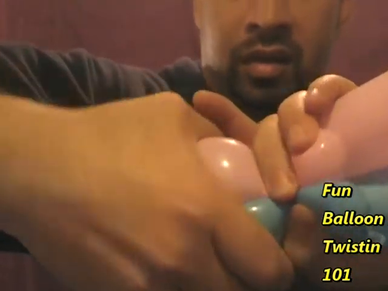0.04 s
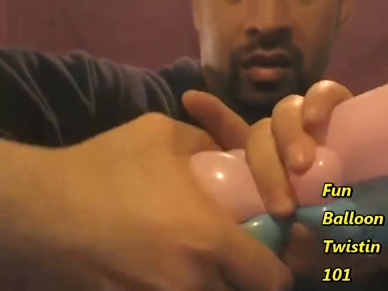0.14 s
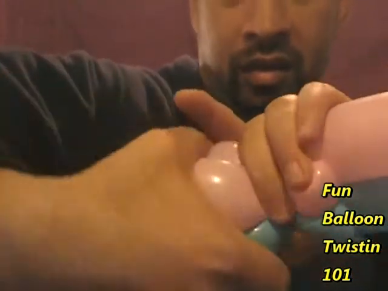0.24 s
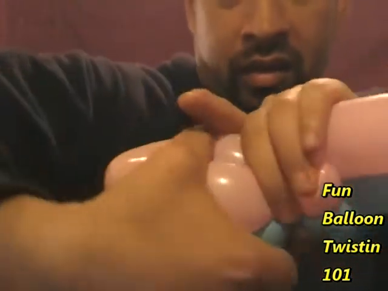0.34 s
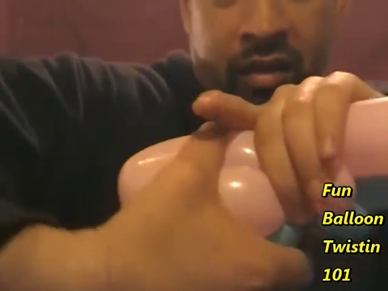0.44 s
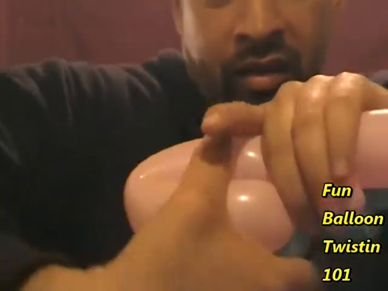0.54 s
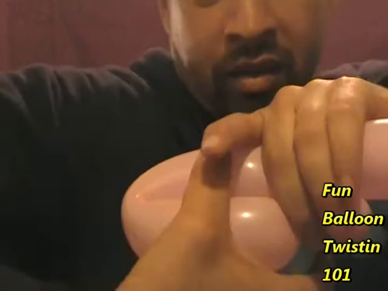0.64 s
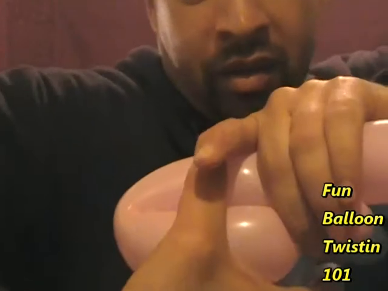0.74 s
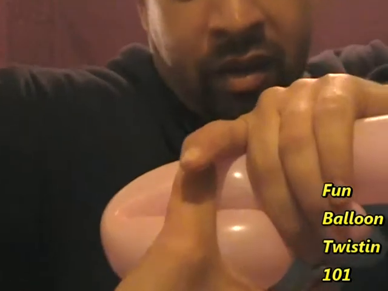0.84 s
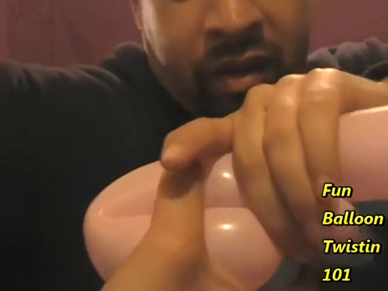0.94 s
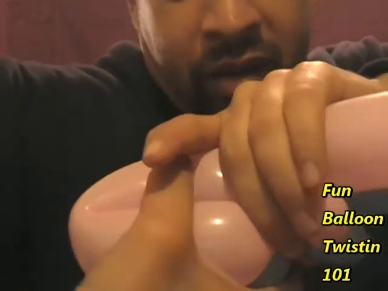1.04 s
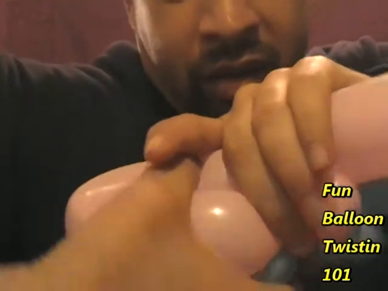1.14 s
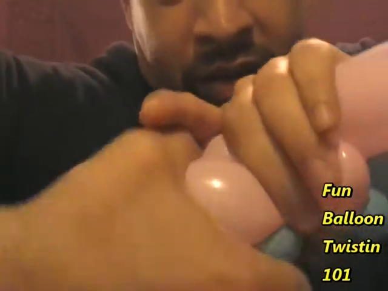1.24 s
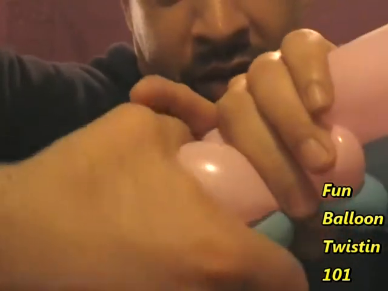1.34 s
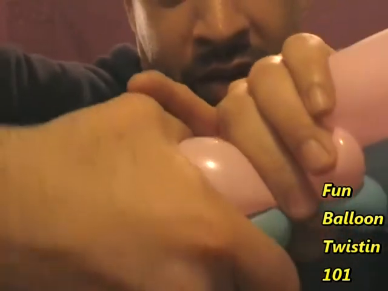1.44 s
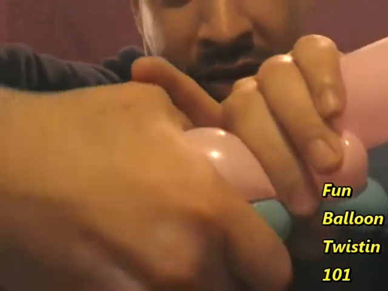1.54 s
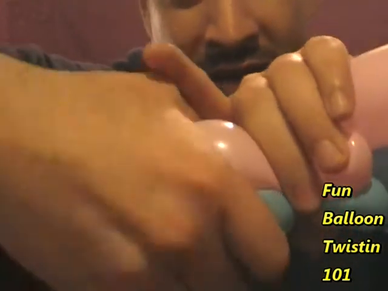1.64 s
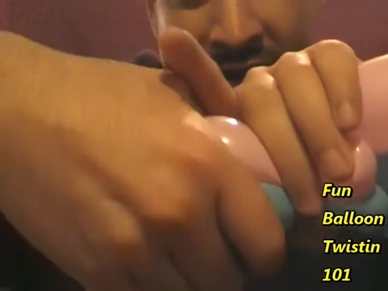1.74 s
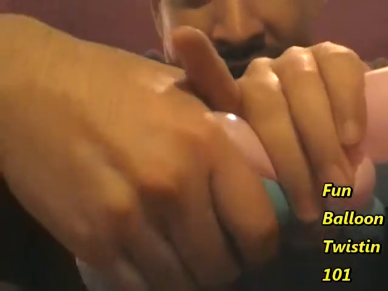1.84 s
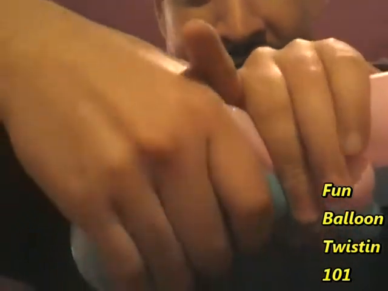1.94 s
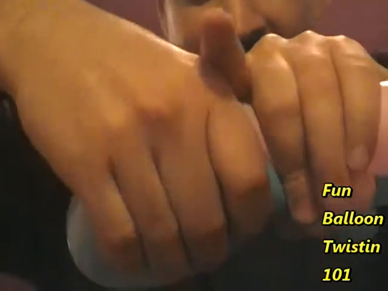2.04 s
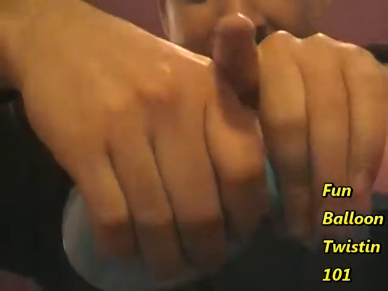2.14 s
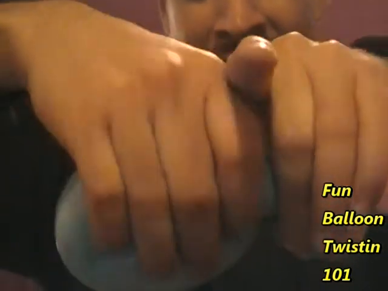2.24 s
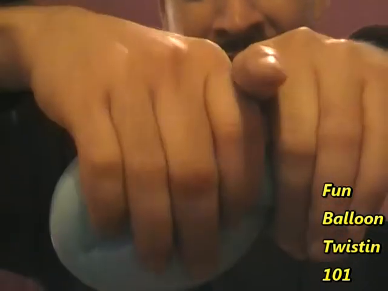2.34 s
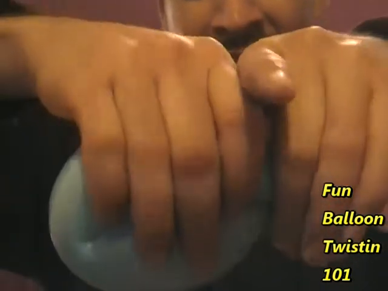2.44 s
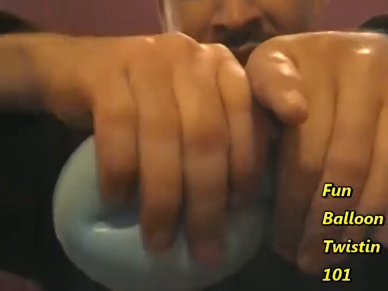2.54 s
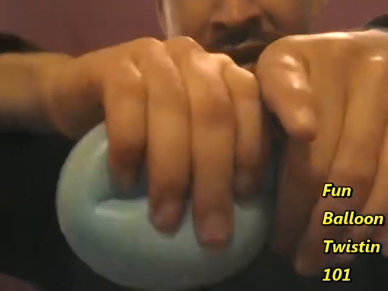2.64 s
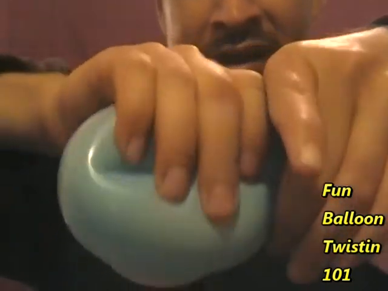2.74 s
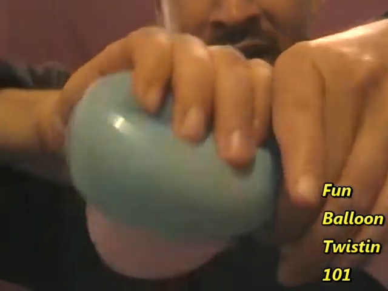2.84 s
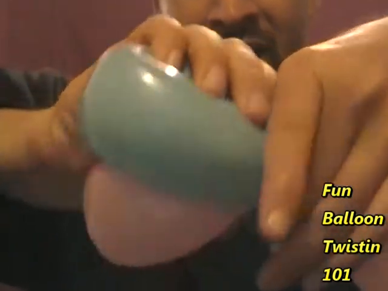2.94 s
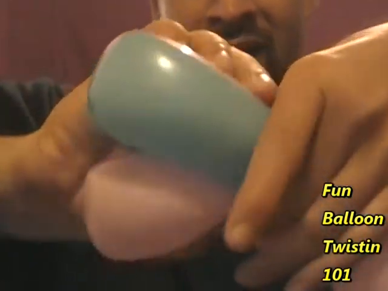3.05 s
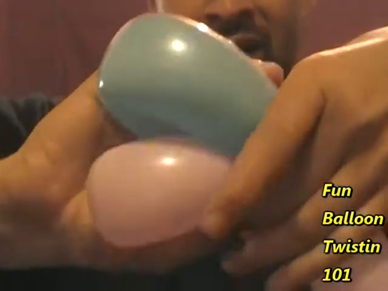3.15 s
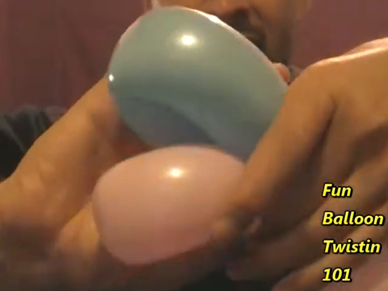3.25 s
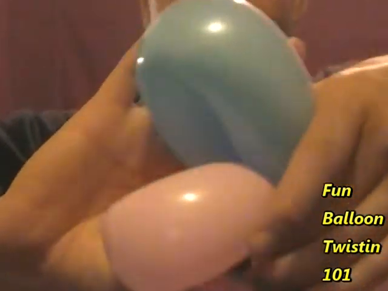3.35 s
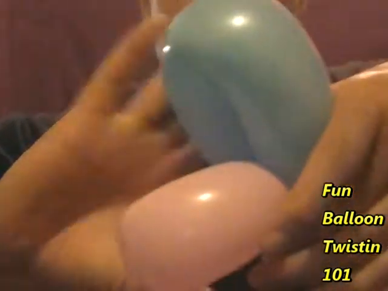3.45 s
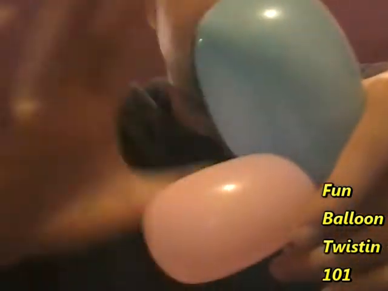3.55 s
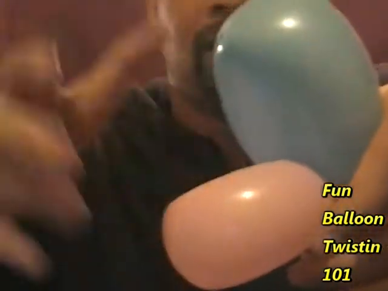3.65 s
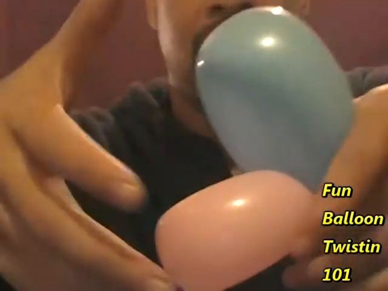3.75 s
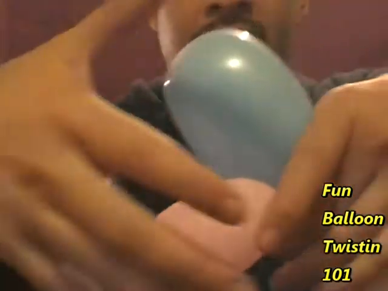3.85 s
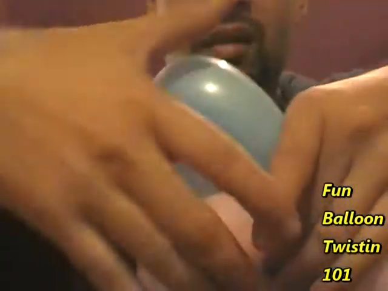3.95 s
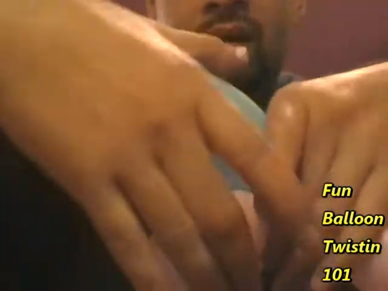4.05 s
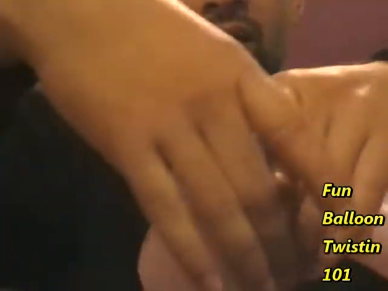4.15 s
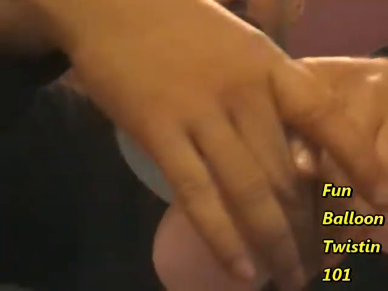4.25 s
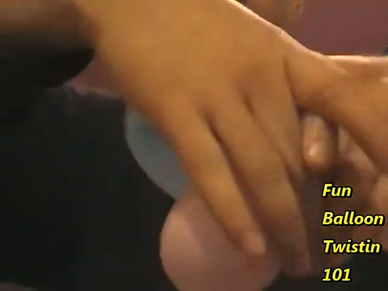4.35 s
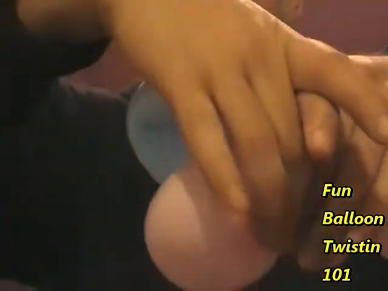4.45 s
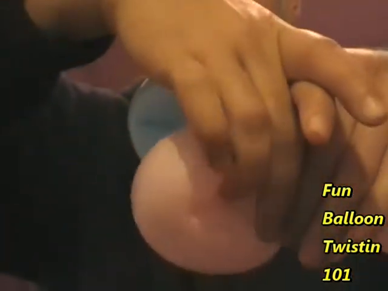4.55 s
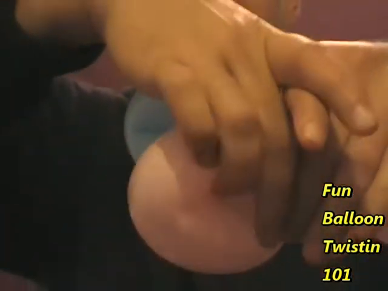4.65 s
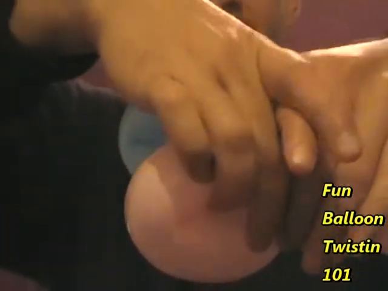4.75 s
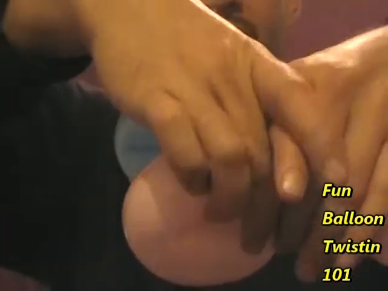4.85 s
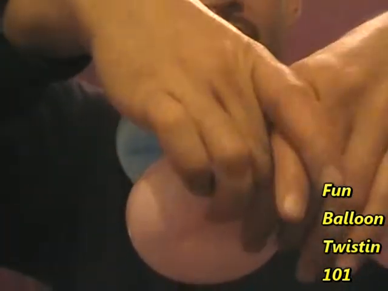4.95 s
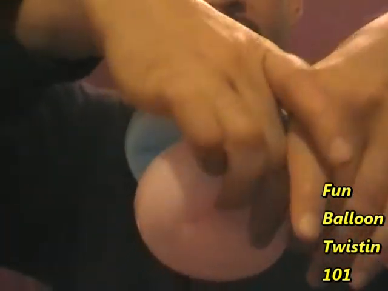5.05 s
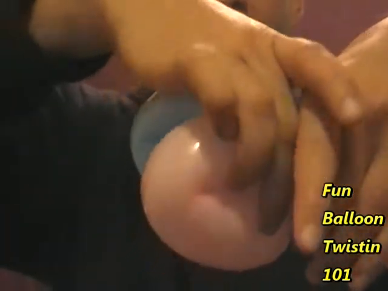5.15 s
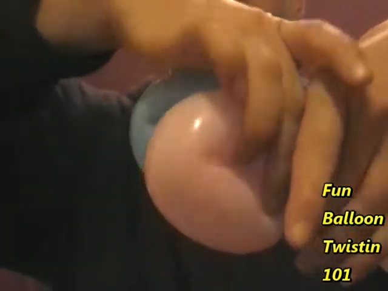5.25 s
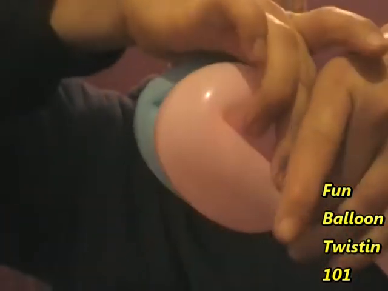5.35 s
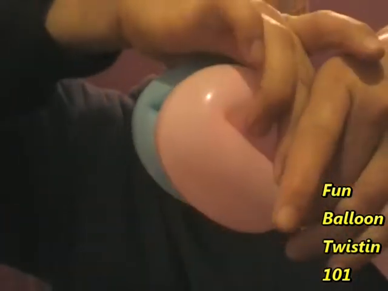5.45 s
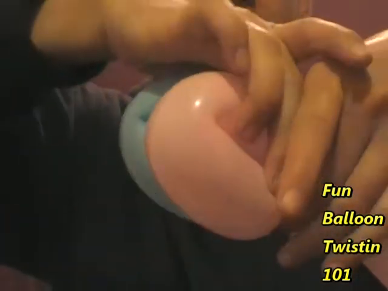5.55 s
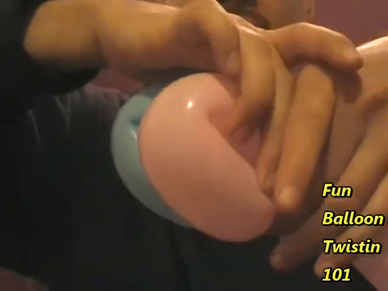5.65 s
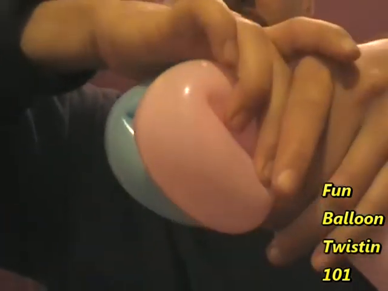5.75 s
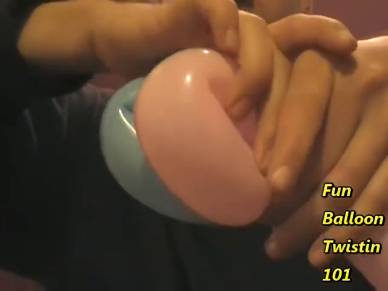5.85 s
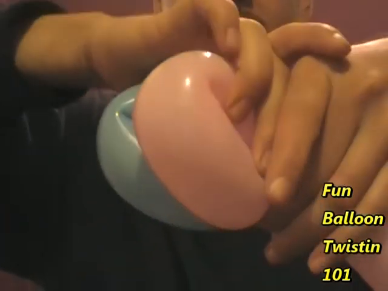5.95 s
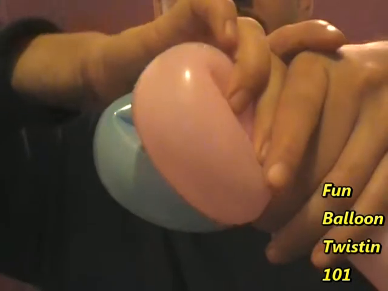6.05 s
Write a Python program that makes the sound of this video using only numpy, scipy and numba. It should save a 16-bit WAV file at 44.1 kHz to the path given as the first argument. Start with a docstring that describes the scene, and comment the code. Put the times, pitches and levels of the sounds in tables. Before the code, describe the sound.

Close up, hands twist taut latex balloons indoors: scratchry rubbing strokes, rubbery snaps, then a long tightening scrape with squeaks and buzzing ratchets.

```python
"""Balloons twisted by hand

Place: a small room with a faint noise floor. Distance: close. Microphone: two ports, in stereo.
Two hands twist inflated latex balloons; the latex sticks and slips as a scratchy rub, ratchets and snaps.
Short strokes come before and after one long twist, with squeaks, a run of zips, finger bumps and brushes.
Every slip shakes the taut skin and the air inside, whose resonances glide as the bubbles are squeezed."""
import sys
import numpy as np
from scipy import signal
from scipy.fft import rfft, irfft, next_fast_len
from scipy.io import wavfile
from scipy.ndimage import uniform_filter1d
from numba import njit

SR = 44100
rng = np.random.default_rng(int(sys.argv[2]) if len(sys.argv) > 2 else 0)


def generate_wav(signal):
    """Clip the signal to [-1, 1] and save it as 16-bit WAV at the path in sys.argv[1]."""
    frames = np.transpose(np.atleast_2d(signal))
    scaled = np.clip(frames, -1, 1) * 32767
    pcm = np.round(scaled).astype(np.int16)
    wavfile.write(sys.argv[1], SR, pcm)


N = 269451
TIME = np.arange(N) / SR
TAPS = 2 ** 14  # longest impulse response [samples]

# faint noise of the room: (frequency [Hz], relative density [dB per Hz])
FLOOR_COLOUR = [(25, -16), (50, -6), (220, -8.5), (500, -14), (1100, -19.5), (2000, -18.5), (7500, -20),
                (11000, -27.5), (16000, -48.5)]
# short rubbing strokes: (start [s], attack [s], hold [s], relative effort [dB], hiss over slips [dB],
# relative treble [dB], relative lower air mode [dB], relative upper air mode [dB])
STROKE_MOVES = [(0, 0.00094, 0.063, -40.5, 0.5, -3, -28, -34),
                (0.1, 0.015, 0.02, -28.5, 4.5, -4.5, -24, -18.5),
                (0.191, 0.023, 0.12, -24, 1.5, 0.5, -22.5, -4.5),
                (.42, 0.081, 0.039, -33.5, -2, -6, -35, -18), (0.711, 0.07, 0.02, -43, 41, -8.5, -21, -13),
                (0.908, 0.0084, 0.017, -41, 12, -2.5, -28, -24),
                (1.074, 0.045, 0.092, -26, -1, 1.5, -28.5, -18),
                (1.265, 0.0088, 0.016, -33.5, -5, 3.5, -26.5, -13.5),
                (1.347, 0.026, 0.083, -26, -4, -2.5, -26, -18),
                (1.495, 0.037, 0.016, -24.5, 3, -7, -25.5, -14),
                (1.601, 0.019, 0.087, -26, 8, -8, -24.5, -16),
                (3.282, 0.029, 0.02, -24, -7, -3, -16.5, -11),
                (3.346, 0.0089, 0.0018, -29.5, 16, 2, -36, -17),
                (4.099, 0.12, 0.17, -48.5, 20, 2, -14.5, -11),
                (4.254, 0.0037, 0.054, -30, 6.5, -8, -10.5, -11.5),
                (4.3, 0.083, 0.06, -26, -2.5, -3.5, -7.5, -6),
                (4.482, 0.016, 0.055, -27, 7.5, -1.5, -19, -10),
                (4.562, 0.033, 0.038, -27, 4.5, 1.5, -12, -6),
                (4.7, 0.035, 0.0391, -34.5, -1.5, 2.5, -11, -9),
                (4.832, 0.0029, 0.071, -36.5, 4, 3, -8.5, -4.5),
                (4.911, 0.0036, 0.065, -25, -4, 1.5, -9, -4.5),
                (4.996, 0.019, 0.28, -20.5, 1, -2.5, -12.5, -8),
                (5.301, .01, 0.033, -29.5, 4, 1, -14, -8.5), (5.459, 0.0037, 0.11, -28.5, 0, -4, -12, -14),
                (5.69, 0.0052, 0.0093, -29.5, -1.5, -6.5, -15.5, -19),
                (5.824, 0.019, 0.059, -29.5, 16, -2, -14, -18),
                (5.954, 0.0039, 0.0049, -29, 0.5, 0, -17, -28.5)]
# single snaps: (time [s], relative peak [dB])
SNAP_EVENTS = [(0.0364, -24), (0.0477, -12.5), (0.1998, -10.5), (0.4312, -16), (0.5163, -20),
               (0.651, -18.5), (0.7254, -23.5), (0.7991, -16.5), (0.843, -22), (0.8682, -24.5),
               (0.882, -21), (1.0822, -13), (1.1196, -9.5), (1.1713, -7), (1.1923, -4.5), (1.2617, -13.5),
               (1.2759, -11), (1.3024, -12.5), (1.3417, -13), (1.39, 0), (1.4004, -5.5), (1.426, -3),
               (1.4512, -7), (1.4811, -5), (1.4985, -5), (1.5156, -4), (1.5378, -7), (1.5448, -5),
               (1.599, -5), (1.6032, -5), (1.6463, -2), (1.689, -4), (1.7545, -7), (1.823, -5.5),
               (1.8701, -6.5), (2.3298, -4), (2.391, -8), (2.4131, -5.5), (3.4199, -24), (3.482, -34),
               (3.6008, -41.5), (3.6862, -41.5), (4.2567, -8), (4.4629, -3), (4.48, -5.5), (4.7658, -11),
               (4.7924, -11), (4.8354, -4.5), (4.9167, -6), (5.052, -6), (5.0691, -7), (5.277, -4.5),
               (5.3755, -11.5), (5.4033, -14.5), (5.797, -21), (5.9317, -7), (5.9409, -12), (6.0064, -8.5)]
# colour of the latex skin: (frequency [Hz], relative density [dB per Hz])
SKIN_COLOUR = [(50, -53), (200, -29.5), (420, -3), (760, -1), (1050, 0.7), (1550, 5.5), (2200, 1),
               (3000, 2.5), (4000, 2), (5200, -1.5), (7600, 1.5), (9000, -3), (11000, -11.5),
               (16000, -28.5)]
# air resonances of the squeezed bubbles: (time [s], lower mode [Hz], upper mode [Hz])
AIR_MODES = [(1.1, 374.7, 480), (1.4, 230, 497), (2.72, 199, 475), (2.81, 345, 690), (2.92, 320, 670),
             (2.98, 277, 472), (3.15, 422, 760), (3.3, 330, 579), (3.385, 299, 798), (4.4, 350, 494),
             (4.6, 349, 790)]
# gliding resonance of the stretched skin:
# (time [s], frequency [Hz], relative level [dB], relative overtone level [dB])
SKIN_SQUEAL = [(.9, 1756, -11, 6.5), (1.5, 1560, -3.5, -21), (1.9, 1600, -16.5, -9), (2.25, 1503, -3.5, -6),
               (2.88, 1675, -18, -27), (3.08, 1758, -14, -3), (4.26, 1755, -3.5, -23.5),
               (4.42, 1330, -4.5, -24), (5.06, 1557, -2, -16), (5.55, 1853, -12, -12)]
# a whole bubble humming under the palm: (time [s], relative level [dB])
PALM_HUM = [(1.0, -30), (2.3, -22), (2.7, -15.5), (2.8, -40), (4.4, -22.5), (6.0, -33)]
# ratcheting runs: (start [s], end [s], first rate [slips/s], last rate [slips/s],
# first relative peak [dB], last relative peak [dB])
RATCHET_RUNS = [(.2444, .342, 93, 79, -8, -12), (.960, 1.036, 84, 84, -5, -17),
                (2.7232, 2.80, 215, 335, -5, -6), (2.802, 2.92, 335, 295, -7, -17),
                (4.925, 4.985, 95, 105, -8, -11), (5.0, 5.355, 115, 125, -10, -11),
                (5.460, 5.603, 125, 95, -14, -14.5), (5.6987, 5.72, 118, 118, -11, -12),
                (5.839, 5.92, 210, 135, -16, -10), (5.9594, 5.99, 120, 110, -10, -11)]
# steady air resonances of a bubble held still:
# (start [s], end [s], [(frequency [Hz], relative level [dB]), ..])
HELD_BUBBLES = [(.235, .34, [(480, -6), (990, -14), (1730, -12)]), (4.9, 5.34, [(738, -24), (1510, -15)]),
                (5.45, 5.73, [(1390, -14), (1830, -11), (2660, -13)]), (5.82, 6.02, [(969, -19),
                (2080, -10), (2520, -13), (4330, -8)])]
# the long twist: (time [s], relative effort [dB], relative treble [dB],
# relative lower air mode [dB], relative upper air mode [dB])
TWIST_MOVES = [(1.72, -32, -3, -24, -10), (1.77, -25.5, -7.5, -23.5, -17), (1.984, -24.5, -4, -24, -29),
               (2.164, -21.5, -5, -23, -22), (2.438, -23, -5.5, -18, -10), (2.58, -23.5, -1.5, -22, -20),
               (2.61, -21.5, -6.5, -10, -5.5), (2.684, -21, -5.5, -19.5, -13), (2.926, -23, -3, -21, -17),
               (3.066, -20.5, -3, -34, -24), (3.104, -20.5, -3.5, -20.5, -12.5),
               (3.19, -26, -4.5, -31, -26.5), (3.275, -40.5, -8, -17, 1)]
# the twist tightens from crackle to fine scrape: (time [s], nominal rate [slips/s], hiss over slips [dB])
TWIST_TIGHTENING = [(1.7, 164, -3), (2.1, 400, 1), (2.7, 380, -7), (3.1, 540, 0.5)]
# gliding squeaks: (start [s], end [s], first pitch [Hz], last pitch [Hz], level before flutter [dB])
SQUEAK_GLIDES = [(2.111, 2.212, 1700, 1445, -25.5), (2.67, 2.799, 440, 525, -32),
                 (2.78, 2.942, 350, 312, -36), (2.984, 3.056, 487, 505, -33),
                 (3.045, 3.135, 560, 740, -27.5), (3.032, 3.095, 1198, 1223, -28),
                 (3.05, 3.119, 2430, 2530, -28), (3.293, 3.365, 326, 275, -34),
                 (3.291, 3.335, 555, 583, -34), (3.362, 3.39, 760, 860, -34)]
# colour of the zips: (frequency [Hz], relative density [dB per Hz])
ZIP_SPECTRUM = [(500, -44.5), (2000, -3.5), (5000, -11), (6500, 2.5), (11000, -4.5), (16000, -30)]
# soft finger bumps on a bubble: (time [s], relative peak [dB])
FINGER_BUMPS = [(3.537, -45), (3.982, -37), (4.463, -21.5), (4.48, -25), (4.575, -22), (4.671, -22.5),
                (4.718, -25.5), (4.745, -18), (4.788, -26), (5.797, -36), (5.817, -30.5), (5.851, -24.5)]
# what a bumped bubble rings with: (frequency [Hz], relative level [dB], 60 dB decay [s])
BUMP_MODES = [(346, 2, 0.082), (435, 2.5, 0.041), (820, 11, 0.0072)]
# a palm brushing a bubble: (middle [s], half length [s], relative level [dB])
PALM_BRUSHES = [(4.002, 0.016, -43.5), (4.064, 0.026, -36)]
# what the brushed skin sings with: (frequency [Hz], width [Hz], relative level [dB])
BRUSH_RESONANCES = [(1127, 70, -2), (1530, 60, -5), (2310, 180, -18), (3890, 710, 0.5)]
# decay of the small room: (frequency [Hz], 60 dB decay [s])
ROOM_DECAY = [(150, 0.11), (500, 0.27), (1500, 0.21), (4000, 0.14), (8000, 0.078), (15000, 0.058)]
# how unlike the room's echoes are in the two channels: (frequency [Hz], relative side level [dB])
ROOM_WIDTH = [(400, -8.5), (1500, -13), (3200, -8.5), (7000, 0), (15000, 6)]
# gain difference of the microphone ports: (frequency [Hz], left over right [dB])
PORT_BALANCE = [(60, -7.5), (200, 1), (700, 2), (2380, 1.5), (8120, -3), (15000, 8)]
# phase difference of the microphone ports: (frequency [Hz], lead of the left [rad])
PORT_PHASE = [(0, 1.6), (260, .6), (860, -.23), (6800, -.1), (7580, .74), (9470, 1.3), (11500, 0)]

FLOOR_DB = -62.5
ATTACK_RISE_DB, RELEASE_DB_PER_S = 13, 280  # every stroke swells by this much, and dies away this fast
SLIPS_PER_S, AT_EFFORT_DB, DOUBLING_DB = 240, -25, 11  # harder strokes make the latex slip faster
EASING_S, EASING_DB = 0.0086, 0.5  # just before a snap the sliding eases very slightly
SNAP_DB = 9  # added to every snap
BASS_LAG_S, LAG_HALVED_HZ = .0011, 2330  # a slip spreads through the skin: its treble arrives first
SKIN_ECHO_T60_S = .0042
RASP_HZ = 5010  # crossover to the treble
SQUEAL_OVERTONE = 2.44  # ratio to the skin's gliding resonance
HUM_HZ = 159
CREAK_START_S, CREAK_END_S, CREAK_HZ, CREAK_DB = .241, .333, 540, 8
HOLD_Q = 15  # pitch over width of a held bubble's resonances
BASS_CUT_HZ = 100  # the small bubbles radiate little below this
ZIP_START_S, ZIP_EVERY_S = 3.1692, .0226
ZIP_DB, ZIP_LOSS_DB = -6, 2  # first zip, and the loss from each zip to the next
CUTOFF_HZ = 16000  # top of the microphone chain


def from_db(db):
    """Decibels to gain."""
    return 10 ** (np.asarray(db) / 20)


def unit_energy(x):
    """A response scaled so that it keeps the level of white noise."""
    return x / np.sqrt(np.sum(x ** 2) + 1e-20)


def in_time(rows):
    """Each column of a curve, joined by straight lines."""
    s, *columns = np.transpose(rows)
    return [np.interp(TIME, s, c) for c in columns]


def at_bins(points, size):
    """A table over frequency, read at the bins of a transform."""
    hz, value = np.transpose(points)
    bins_hz = np.fft.rfftfreq(size, 1 / SR)
    return np.interp(np.log(bins_hz + 1), np.log(hz + 1), value)


def drift(per_s):
    """Smooth chance with a spread near 1."""
    return np.interp(TIME * per_s, np.arange(TAPS), rng.standard_normal(TAPS))


def through(x, response):
    """A signal passed through an impulse response."""
    return signal.oaconvolve(x, response)[:N]


def butter(x, hz, kind):
    """Second-order Butterworth filter."""
    return signal.sosfilt(signal.butter(2, hz, kind, fs=SR, output="sos"), x)


def colour(x, spectrum):
    """Causal (minimum-phase) filter with this spectrum; white noise keeps its level."""
    cepstrum = irfft(np.log(from_db(at_bins(spectrum, TAPS))))
    # folding the cepstrum forward makes the filter minimum-phase
    cepstrum[1:TAPS // 2] *= 2
    cepstrum[TAPS // 2 + 1:] = 0
    return through(x, unit_energy(irfft(np.exp(rfft(cepstrum)))))


def clicks(times, peak_db):
    """One impulse for each time."""
    out = np.zeros(N)
    places = np.round(np.asarray(times) * SR).astype(int)
    out[np.clip(places, 0, N - 1)] = from_db(peak_db)
    return out


@njit
def spin(x, poles):
    """One complex resonator whose pole moves from sample to sample."""
    out, state = np.zeros(len(x)), 0j
    for i in range(len(x)):
        state = state * poles[i] + x[i]
        out[i] = state.real
    return out


def air_mode(x, hz, width_hz, low_hz, top_hz):
    """A resonance, able to glide, with darkened skirts; white noise keeps about its level."""
    r = np.exp(-np.pi * width_hz / SR)
    ringing = spin(x, r * np.exp(2j * np.pi * hz / SR)) * np.sqrt(2 * (1 - r * r))
    return butter(ringing, [low_hz, top_hz], "band")


def room_floor():
    """Faint steady noise of the room, independent in the two channels."""
    noise = [colour(rng.standard_normal(N), FLOOR_COLOUR) for channel in range(2)]
    return from_db(FLOOR_DB) * np.array(noise)


def strokes():
    """Each stroke swells, holds and dies away; yields (effort, slips per s, hiss, treble, air modes)."""
    for start, attack, hold, level_db, *tone in STROKE_MOVES:
        t = TIME - start
        rise_db = ATTACK_RISE_DB * (1 - np.clip(t / max(attack, 1e-3), 0, 1))
        release_db = RELEASE_DB_PER_S * np.maximum(t - attack - hold, 0)
        per_s = SLIPS_PER_S * 2 ** ((level_db - AT_EFFORT_DB) / DOUBLING_DB)
        yield np.where(t < 0, -np.inf, level_db - rise_db - release_db), per_s, *tone


def rub(per_s, hiss_db, unevenness, size_spread_db, flutter_db):
    """Uneven slips of many sizes over the hiss of sliding latex; level near 1."""
    turns = np.cumsum(np.abs(per_s) * np.exp(unevenness * drift(170))) / SR
    slips = np.diff(np.floor(turns), prepend=0)
    slips *= from_db(size_spread_db * np.clip(rng.standard_normal(N), -2, 2))
    slips *= np.sign(drift(25) + .5)  # the skin is flicked outward or inward
    slips /= np.sqrt(np.abs(uniform_filter1d(slips ** 2, size=1800)) + 1e-5)  # evens out the level
    hiss = rng.standard_normal(N) * from_db(hiss_db + flutter_db * drift(300))
    return (slips + hiss) / np.sqrt(1 + from_db(2 * hiss_db))


def disperse(x):
    """The skin carries treble faster, so each click becomes a tiny falling chirp of the same colour."""
    hz = np.fft.rfftfreq(TAPS, 1 / SR)
    phase = 2 * np.pi * BASS_LAG_S * LAG_HALVED_HZ * np.log1p(hz / LAG_HALVED_HZ)
    return through(x, irfft(np.exp(-1j * phase))[:TAPS // 2])


def scatter(x, t60, shifts_per_s, count=8):
    """Echoes round the taut skin; their pattern keeps changing as the contact point travels."""
    t = TIME[:TAPS // 8]
    place = np.cumsum(shifts_per_s * np.exp(.5 * drift(20))) / SR
    out = 0
    for k in range(count):
        # crossfade between neighbouring echo patterns
        nearness = np.sqrt(np.clip(1 - np.abs((place - k + 1) % count - 1), 0, 1))
        echoes = rng.standard_normal(len(t)) * from_db(-60 * t / t60) * (t > .0001)
        out = out + through(x * nearness, unit_energy(echoes))
    return out


def brighten(x, treble_db):
    """Raises or lowers everything above the crossover."""
    low = butter(butter(x, RASP_HZ, "low"), RASP_HZ, "low")
    high = butter(butter(x, RASP_HZ, "high"), RASP_HZ, "high")
    return low + from_db(treble_db) * high


def latex_skin(force, treble_db):
    """The struck skin sounds at once, then through its own short echoes."""
    echoes = scatter(force, t60=SKIN_ECHO_T60_S, shifts_per_s=300)
    skin = colour(from_db(-1.3) * force + from_db(-8.5) * echoes, SKIN_COLOUR)
    return brighten(skin, treble_db + 3.5)


def resonances(force, lower_db, upper_db):
    """The skin's squeal and overtone, two gliding air modes and the hum all ring with the slips."""
    (lower_hz, upper_hz), (hum_db,) = in_time(AIR_MODES), in_time(PALM_HUM)
    squeal_hz, squeal_db, overtone_db = in_time(SKIN_SQUEAL)
    # short scattered echoes of the slips drive the resonances
    echoes = scatter(force, t60=0.0064, shifts_per_s=900)
    squeal = air_mode(echoes, squeal_hz, width_hz=340, low_hz=1060, top_hz=3240)
    overtone = air_mode(echoes, SQUEAL_OVERTONE * squeal_hz, width_hz=2800, low_hz=2540, top_hz=5170)
    lower = air_mode(echoes, lower_hz, width_hz=97, low_hz=201, top_hz=685)
    upper = air_mode(echoes, upper_hz, width_hz=137, low_hz=352, top_hz=1426)
    hum = air_mode(echoes, np.full(N, HUM_HZ), width_hz=43, low_hz=105.0, top_hz=285)
    out = from_db(squeal_db - 3.0) * squeal + from_db(overtone_db - 10.5) * overtone
    out += from_db(lower_db) * lower + from_db(upper_db - 2.0) * upper
    return out + from_db(hum_db - 5.0) * hum


def easing():
    """1 just before each snap, else 0, with briefly smoothed edges."""
    before_snap = sum((TIME > s - EASING_S) & (TIME < s) for s, db in SNAP_EVENTS)
    return uniform_filter1d(np.minimum(before_snap, 1.), size=64)


def snaps():
    """The latex lets go all at once: one impulse per snap."""
    snap_s, snap_db = np.transpose(SNAP_EVENTS)
    return clicks(snap_s, snap_db + SNAP_DB)


def held(force):
    """While the grip stays put, every slip rings the same narrow resonances."""
    out = 0
    for start, end, modes in HELD_BUBBLES:
        drive = force * (TIME > start) * (TIME < end) + 1e-18
        for hz, db in modes:
            ring = air_mode(drive, np.full(N, hz), hz / HOLD_Q, low_hz=hz / 2, top_hz=hz * 2)
            out = out + from_db(db) * ring
    return out


def creak(jerks):
    """Pressed hard, the first ratchet shakes the whole bubble into a broad low resonance."""
    pressed = jerks * (TIME > CREAK_START_S) * (TIME < CREAK_END_S)
    ring = air_mode(pressed + 1e-18, np.full(N, CREAK_HZ), width_hz=380, low_hz=286, top_hz=820)
    return from_db(CREAK_DB) * ring


def ratchet(jitter, size_spread_db):
    """Tight latex lets go in nearly even jerks; returns them and a mask of when it grips."""
    out, gripping = np.zeros(N), np.zeros(N)
    for start, end, first_rate, last_rate, first_db, last_db in RATCHET_RUNS:
        chance, times = rng.standard_normal((2, 64)), [start]
        while times[-1] < end and len(times) < chance.shape[1]:
            rate = np.interp(times[-1], [start, end], [first_rate, last_rate])
            times.append(times[-1] + np.exp(jitter * chance[0, len(times)]) / rate)
        times = times[:-1]
        peak_db = np.interp(times, [start, end], [first_db, last_db])
        out += clicks(times, peak_db + size_spread_db * chance[1, :len(times)])
        gripping[(TIME > start) & (TIME < end)] = 1
    return out, uniform_filter1d(gripping, size=256)


def twist():
    """The same controls as a stroke for the long twist, which also ends like one."""
    effort_db, *tone = in_time(TWIST_MOVES)
    effort_db = effort_db - RELEASE_DB_PER_S * np.maximum(TIME - TWIST_MOVES[-1][0], 0)
    effort_db = np.where(TIME < TWIST_MOVES[0][0], -np.inf, effort_db)
    return [effort_db, *in_time(TWIST_TIGHTENING), *tone]


def hands():
    """At each moment the strongest movement sets effort, grip and tone."""
    effort_db, *tone = twist()
    tone = np.array(tone)
    for stroke_db, *stroke_tone in strokes():
        leads = stroke_db > effort_db
        tone[:, leads] = np.array(stroke_tone)[:, None]
        effort_db = np.maximum(effort_db, stroke_db)
    return effort_db, *uniform_filter1d(tone, size=256, axis=1)


def balloons():
    """Sliding, ratcheting and snapping drive the skin and every resonance."""
    effort_db, per_s, hiss_db, treble_db, lower_db, upper_db = hands()
    jerks, gripping = ratchet(jitter=.03, size_spread_db=0.0)
    # while the latex ratchets, it slides less between the jerks
    sliding_db = effort_db + 1.15 - 5 * gripping - EASING_DB * easing()
    slips = rub(per_s, hiss_db, unevenness=.38, size_spread_db=5.0, flutter_db=3.0)
    force = disperse(from_db(sliding_db) * slips + from_db(8.5) * jerks + snaps())
    whole = latex_skin(force, treble_db) + resonances(force, lower_db, upper_db)
    return butter(whole + creak(jerks) + held(force), BASS_CUT_HZ, "high")


def squeaks(waver_hz, flutter_db, fade):
    """The slipping locks onto one resonance, which sings roughly and glides as the tension changes."""
    out = np.zeros(N)
    waver = waver_hz * drift(230)  # at a pitch of 1000 Hz, and in proportion elsewhere
    flutter = from_db(flutter_db * drift(160))
    for start, end, first_hz, last_hz, level_db in SQUEAK_GLIDES:
        span = (TIME > start) & (TIME < end)
        hz = np.linspace(first_hz, last_hz, span.sum())
        phase = 2 * np.pi * np.cumsum(hz + waver[span] * hz / 1000) / SR
        envelope = signal.windows.tukey(len(hz), np.clip(fade, 0, 1)) * flutter[span]
        out[span] += from_db(level_db) * envelope * np.sin(phase)
    return out


def zips(t60, count=5):
    """A fingertip skips off in an even, fading run; each zip of fast slips is a short bright noise burst."""
    k = np.arange(count)
    starts = clicks(ZIP_START_S + ZIP_EVERY_S * k, ZIP_DB - ZIP_LOSS_DB * k)
    envelope = through(starts, from_db(-60 * TIME[:TAPS] / t60))
    return colour(envelope * rng.standard_normal(N), ZIP_SPECTRUM)


def bumps():
    """A fingertip lands on a bubble, which rings low and short."""
    t = TIME[:TAPS]
    ring = sum(from_db(db - 60 * t / t60) * np.sin(2 * np.pi * hz * t) for hz, db, t60 in BUMP_MODES)
    ring = butter(ring, 220, "high")  # a small bubble radiates little bass
    return from_db(-8.0) * through(clicks(*np.transpose(FINGER_BUMPS)), ring)


def brushes(ring_db, hiss_db):
    """Light, smooth sliding of a palm that sings in a few narrow resonances of the skin."""
    pressure = sum(from_db(db) * np.exp(-((TIME - s) / half) ** 2) for s, half, db in PALM_BRUSHES)
    friction = rng.standard_normal(N) * pressure
    ring = 0
    for hz, width_hz, db in BRUSH_RESONANCES:
        mode = air_mode(friction + 1e-18, np.full(N, hz), width_hz, low_hz=688, top_hz=6130)
        ring = ring + from_db(db) * mode
    return from_db(ring_db) * ring + from_db(hiss_db) * colour(friction, SKIN_COLOUR)


def room(x, wet_db, gap_s):
    """Diffuse echoes of a small room follow the direct sound and die sooner in the upper treble."""
    t, (centres, t60s) = TIME[:TAPS], np.transpose(ROOM_DECAY)
    noise, tails = rfft(rng.standard_normal((2, TAPS))), 0  # mid and side
    noise[1] *= from_db(at_bins(ROOM_WIDTH, TAPS))
    # each band of the noise dies away at its own pace
    for share, t60 in zip(np.eye(len(centres)), t60s):
        band = irfft(noise * at_bins(np.c_[centres, share], TAPS))
        tails = tails + band * from_db(-60 * t / t60) * (t > gap_s)
    mid, side = from_db(wet_db) * tails / np.linalg.norm(tails[0])
    both = np.array([x + through(x, mid + side), x + through(x, mid - side)])
    return both / np.sqrt(1 + from_db(2 * wet_db))


def scene():
    """The balloons in the room, over its faint noise."""
    floor = room_floor()
    latex = balloons() + squeaks(waver_hz=28, flutter_db=2.0, fade=0.2) + bumps() + zips(t60=0.011)
    latex += brushes(ring_db=-10.5, hiss_db=-2)
    return room(latex, wet_db=-11.5, gap_s=0.0041) + floor


def record(dry):
    """Two close microphone ports differ in gain and phase; peaks are rounded and the top is cut."""
    size = next_fast_len(N + TAPS)
    # each port takes half of the difference
    left = from_db(at_bins(PORT_BALANCE, size) / 2) * np.exp(.5j * at_bins(PORT_PHASE, size))
    heard = irfft(rfft(dry, size) * np.array([left, 1 / left]), size)[:, :N]
    rounded = .92 * np.tanh(heard / .92)
    return signal.sosfilt(signal.ellip(10, .1, 80, CUTOFF_HZ, fs=SR, output="sos"), rounded)


dry = scene()
out = record(dry)
generate_wav(out)
```